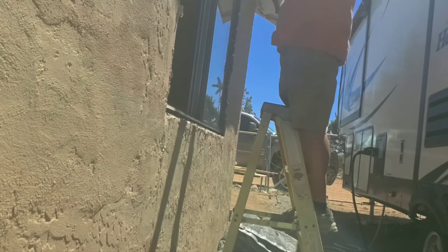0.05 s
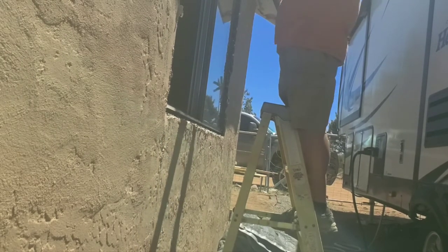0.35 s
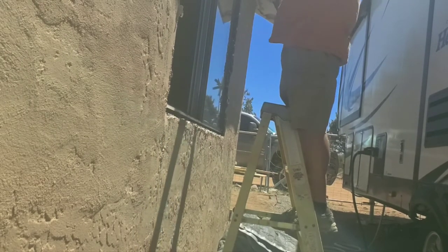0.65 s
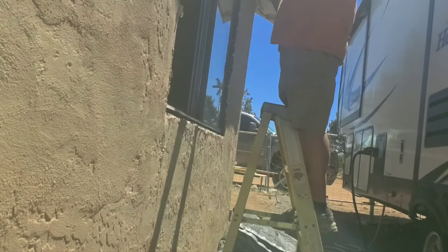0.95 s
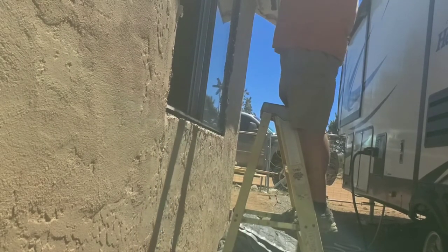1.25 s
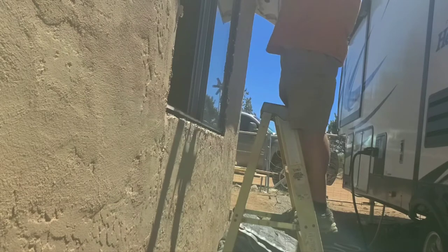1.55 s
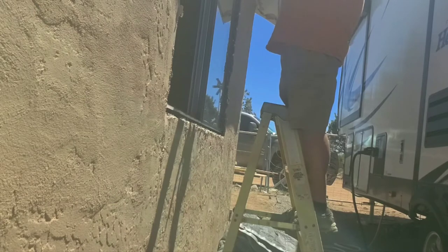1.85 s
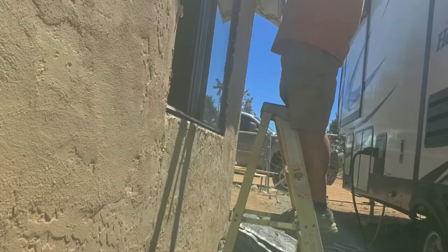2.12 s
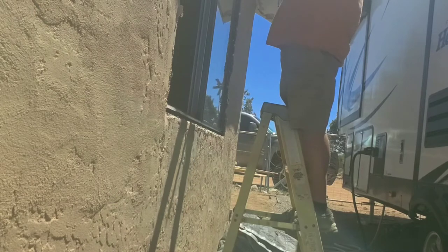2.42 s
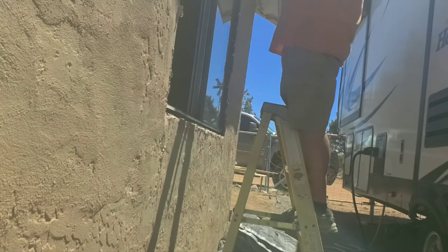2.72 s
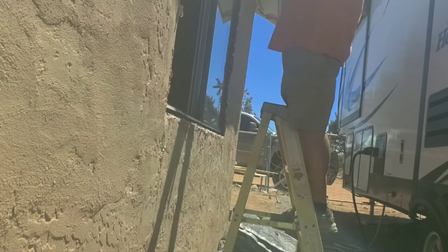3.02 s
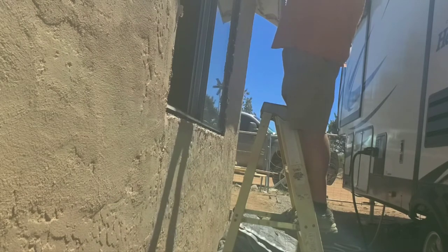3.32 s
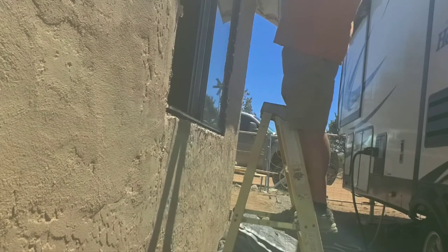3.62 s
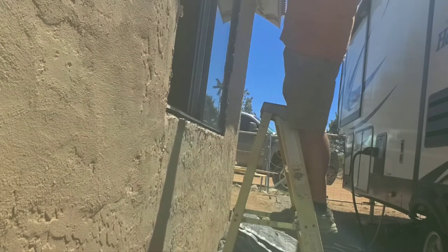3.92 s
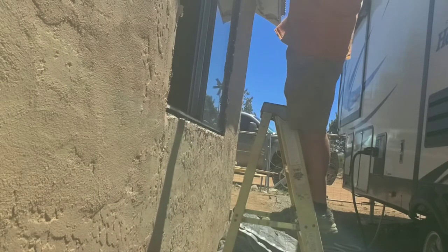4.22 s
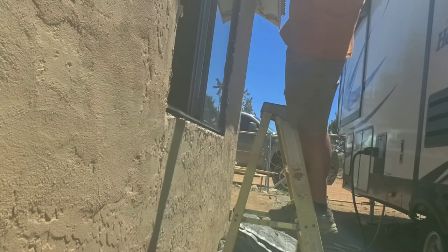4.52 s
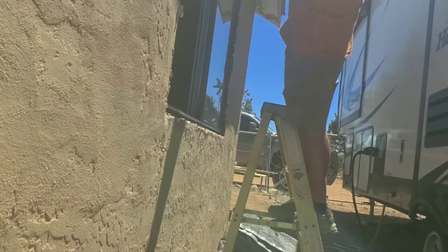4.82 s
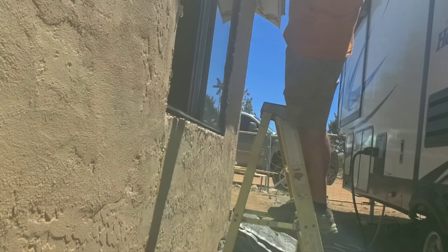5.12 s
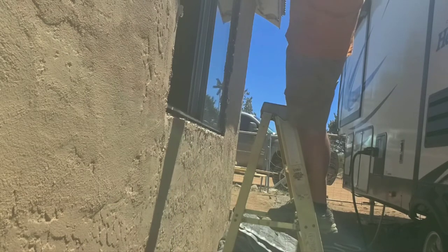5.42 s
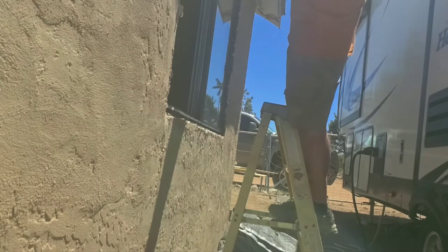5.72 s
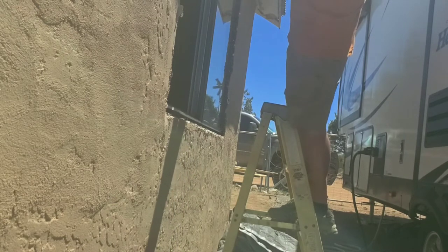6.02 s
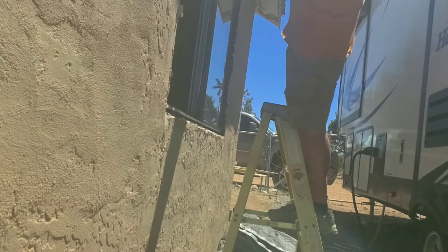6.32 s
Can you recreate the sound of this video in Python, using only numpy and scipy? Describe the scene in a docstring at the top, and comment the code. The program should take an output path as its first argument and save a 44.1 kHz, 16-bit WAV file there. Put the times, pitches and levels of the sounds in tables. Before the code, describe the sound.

The sound opens outdoors with a dull thump on a hollow wall and light wind buffeting the microphone. From about 0.5 to 2.5 seconds a steel bar is worked into stucco around a window: irregular gritty crunches, small clinks, snapping chips and soft thuds, with a faint squeaky scrape near 2.3 seconds. Up to 4 seconds it is quieter, with a few dull knocks and falling crumbs as the wind fades. At about 4.1 seconds a hammer starts striking the bar, eight loud, even blows roughly a third of a second apart, the hardest near 5.8 seconds and the last at 6.4. Each is a sharp steel hit with a short ring, some with a high ping, echoing briefly between the wall and a trailer alongside. Beneath the blows the wall thuds and shudders, loosened sand trickles faintly and a little wind returns.

```python
"""A hammer drives a steel bar into stucco around a window: eight ringing blows, each rattling between
the house wall and a trailer parked alongside. Before the blows the bar is worked into the crust, which
crunches and sheds chips. The hollow wall thuds and shudders, loosened sand trickles down,
and a light wind buffets the microphone."""
import sys
import numpy as np
from scipy import signal
from scipy.fft import rfft, irfft, next_fast_len
from scipy.io import wavfile
from scipy.ndimage import map_coordinates

SR = 44100
rng = np.random.default_rng(int(sys.argv[2]) if len(sys.argv) > 2 else 0)


def wav_record(signal):
    """Record a signal, one row per channel, as 16-bit PCM in the file named by sys.argv[1]."""
    frames = np.transpose(np.atleast_2d(signal))
    bounded = np.clip(frames, -1, 1)
    # unit amplitude maps onto the largest positive 16-bit level
    quanta = np.round(bounded * 32767).astype(np.int16)
    wavfile.write(sys.argv[1], SR, quanta)


N = 284886


def amp(db):
    """dB to gain."""
    return 10 ** (np.asarray(db) / 20)


def unit(x):
    """Scale to rms 1."""
    return x / np.sqrt(np.mean(x ** 2) + 1e-20)


def along(points, hz):
    """Interpolate (freq_hz, value) rows on a log axis."""
    freq_hz, values = np.transpose(points)
    return np.interp(np.log(hz + 1), np.log(freq_hz + 1), values)


def curve(rows):
    """Interpolate (time_s, value) rows per sample."""
    return np.interp(np.arange(N) / SR, *np.transpose(rows))


def wobble(rate_hz, size=N):
    """Smooth random curve."""
    knots = rng.standard_normal(int(size * rate_hz / SR) + 4)
    return map_coordinates(knots, [np.arange(size) * rate_hz / SR])


def fade(t, t60_s, rise_s):
    """Quick rise, exponential decay."""
    return (1 - np.exp(-t / rise_s)) * np.exp(-np.log(1000) * t / t60_s)


def add(track, start_s, sound):
    """Mix sound into track."""
    i = max(round(start_s * SR), 0)
    track[:, i:i + sound.shape[1]] += sound[:, :max(N - i, 0)]


def filtered(x, response):
    """Zero-phase filter with gain response(hz)."""
    size = x.shape[-1]
    padded = next_fast_len(size + 4096)
    return irfft(rfft(x, padded) * response(np.fft.rfftfreq(padded, 1 / SR)), padded)[..., :size]


def colour(x, spectrum):
    """Shape by (freq_hz, gain_db) rows; rms 1."""
    return unit(filtered(x, lambda hz: amp(along(spectrum, hz))))


def resonate(x, peaks):
    """Shape by (freq_hz, width_hz, gain_db) resonances; rms 1."""
    def response(f):
        return np.sqrt(sum(amp(db) ** 2 / (1 + (2 * (f - hz) / width_hz) ** 2) * np.minimum(f / hz, 1)
                           for hz, width_hz, db in peaks))
    return unit(filtered(x, response))


def noise(size, corr):
    """Stereo white noise with channel correlation corr."""
    angle = np.arccos(np.clip(corr, -1, 1)) / 2
    mid, side = rng.standard_normal((2, size)) * [[np.cos(angle)], [np.sin(angle)]]
    return np.array([mid + side, mid - side])


def grains(size, per_s, spread_db, corr, life_s=0.003):
    """Noise broken into tiny fractures of unequal strength."""
    starts = rng.random(size) < per_s / SR
    strength = amp(spread_db * np.clip(rng.standard_normal(size), -2, 2))
    power = signal.lfilter([1], [1, -np.exp(-1 / (life_s * SR))], starts * strength ** 2)
    return noise(size, corr) * np.sqrt(power)


def ring(t, modes, rise_s):
    """Free modes; reflections randomise strength, phase and flutter."""
    hz, db, t60_s = np.transpose(modes)[:, :, None]
    strength = amp(db + 2 * rng.standard_normal(hz.shape))
    phase = 2 * np.pi * rng.random(hz.shape) + 0.5 * rng.standard_normal((2, len(modes), 1))
    knots = rng.standard_normal((2, len(modes), 64))
    flutter = np.array([[np.interp(t * 60, np.arange(len(k)), k) for k in channel] for channel in knots])
    tones = np.sin(2 * np.pi * hz * t + phase + flutter / np.pi)
    return np.sum(strength * fade(t, t60_s, rise_s) * tones, axis=1)


# Breeze strength: time_s, level_db
BREEZE_LEVEL = [(0, -26.5), (.2, -36), (.45, -48), (.6, -37.5), (.97, -55.5), (1.2, -30), (1.65, -36.5),
                (2.38, -41.5), (2.54, -66.5), (2.82, -42.5), (3.0, -60.5), (3.5, -74), (4.08, -93),
                (4.55, -40.5), (4.9, -59.5), (5.02, -59), (5.5, -59.5), (6.46, -51)]
# Buffeting at the microphone: freq_hz, gain_db
BUFFET_SPECTRUM = [(15, -22), (28, -6), (55, 4.5), (90, 4), (130, -2.5), (230, -13), (390, -19.5),
                   (600, -33), (1200, -37), (3000, -51.5)]
# Outdoor air: freq_hz, gain_db
AIR_SPECTRUM = [(15, -64), (25, -43), (82, -26.5), (117, -25), (217, -44), (263, -22), (575, -24.5),
                (641, -21.5), (2410, -35.5), (3520, -41.5), (5200, -42), (8000, -79.5), (16000, -59)]


def wind(eddy_hz=24, eddy_db=5, port_db=1.5, air_db=-66):
    """Eddies, partly different at each microphone port, over quiet air."""
    shared = np.clip(wobble(eddy_hz), -2, 1)
    per_port = np.array([wobble(eddy_hz), wobble(eddy_hz)])
    eddies = amp(eddy_db * shared + port_db * per_port)
    buffet = amp(curve(BREEZE_LEVEL)) * unit(eddies * colour(noise(N, corr=-0.13), BUFFET_SPECTRUM))
    return buffet + amp(air_db) * colour(noise(N, corr=0.25), AIR_SPECTRUM)


# Dull contacts with wall and ground: start_s, level_db, pitch_hz, t60_s
THUMPS = [(.014, -21, 151, 0.14), (0.031, -26, 248, 0.11), (1.631, -34, 150, 0.22),
          (2.806, -39, 860, 0.046), (2.844, -31.5, 111, 0.093), (3.072, -36, 766, 0.073),
          (4.295, -27.5, 215.3, 0.18), (5.1, -39.5, 237, 0.16), (6.369, -34.5, 198.4, 0.31)]


def thumps():
    """Blunt contacts: one low resonance in a puff of rumble."""
    out, t = np.zeros((2, N)), np.arange(SR // 2) / SR
    for start_s, level_db, hz, t60_s in THUMPS:
        puff = colour(noise(len(t), corr=0.12), [(hz / 4, -16), (hz, 0), (hz * 2, -12), (hz * 6, -55)])
        body = 0.97 * np.sin(2 * np.pi * hz * t) + 0.74 * puff
        add(out, start_s, amp(level_db) * body * fade(t, t60_s, 0.0022))
    return out


# Chips snapping off and landing: start_s, level_db, sparkle_db, t60_s
CHIPS = [(0.021, -61, -27, 0.56), (0.106, -56, 11, .015), (0.353, -57, -3, .02), (0.656, -32, -36, 0.2),
         (0.764, -29, -32, 0.076), (1.180, -35, 15, 0.044), (1.269, -45.5, 1, 0.15),
         (1.406, -35.5, -5, 0.011), (1.478, -43, 2, .006), (1.495, -45, -23, 0.056),
         (1.615, -43.5, -29, 0.015), (1.682, -53, -8, 0.031), (1.744, -57.5, -18, 0.056),
         (1.84, -62, -5, .006), (1.982, -42, -13, 0.0082), (2.086, -53, -7, 0.032),
         (2.438, -43.5, -31, 0.04), (3.248, -61, -11, 0.11), (3.641, -45, -28, 0.077),
         (3.801, -53, -21, 0.12), (3.843, -51, -20, 0.097), (3.908, -51, -13, 0.028),
         (5.047, -52.5, -25.5, .08), (5.635, -37, -16, 0.1), (5.982, -44, -34, 0.18),
         (6.28, -50, -30, 0.24)]
# Grit: freq_hz, gain_db
GRIT_SPECTRUM = [(1200, -5), (2500, 2), (4000, -1.5), (6000, -2), (8000, -12), (15000, -5)]
# Top sparkle of grit: freq_hz, gain_db
SPARKLE_SPECTRUM = [(4000, -31.5), (9000, -13), (13000, -3), (16000, 5)]


def chips():
    """Each chip: a brittle crack, then a spray of crumbs."""
    def gritty(x, sparkle_db):
        return colour(x, GRIT_SPECTRUM) + amp(sparkle_db) * colour(x, SPARKLE_SPECTRUM)

    out, t = np.zeros((2, N)), np.arange(SR // 5) / SR
    for start_s, level_db, sparkle_db, t60_s in CHIPS:
        crack = amp(0.5) * gritty(noise(len(t), corr=0.2), sparkle_db) * fade(t, 0.004, 0.0001)
        spray = gritty(grains(len(t), per_s=3600, spread_db=14.5, corr=0.31), sparkle_db)
        envelope = fade(t, t60_s, 0.00044) + amp(-16) * fade(t, 0.22, 0.0031)
        add(out, start_s, amp(level_db) * (crack + spray * envelope))
    return out


# Crackle strength: time_s, level_db
CRACKLE_LEVEL = [(0, -129), (.4, -63), (.87, -71.5), (1.0, -69), (1.5, -83), (1.95, -68), (2.18, -80),
                 (2.4, -66), (2.7, -86), (3.15, -80.5), (3.5, -73), (3.85, -66.5), (4.15, -84), (4.8, -78),
                 (5.5, -72), (6.46, -68)]
# Fine crackle: freq_hz, gain_db
CRACKLE_SPECTRUM = [(2000, -18), (5000, -3), (7000, -3), (8500, -5), (10500, 0), (13000, -3), (15700, -3)]


def crackle(ticks_per_s=17, tick_db=-4):
    """The crust crackles softly; single grains tick."""
    fine = unit(grains(N, per_s=1000, spread_db=5.5, corr=0.1))
    ticks = unit((rng.random(N) < ticks_per_s / SR) * noise(N, corr=0.14))
    return amp(curve(CRACKLE_LEVEL)) * colour(fine + amp(tick_db) * ticks, CRACKLE_SPECTRUM)


# Prying knocks: start_s, level_db, thud_db, clink_db, t60_s, rise_s
KNOCKS = [(.517, -46, -1.5, -28, .14, 0.00087), (.613, -44.5, -17, -5, 0.12, 0.00083),
          (.643, -31.5, -10, 2.5, 0.28, 0.0015), (.68, -32.5, 7.5, 2, 0.062, 0.0014),
          (.763, -41, -3, 2, 0.12, 0.0015), (0.954, -44, 1, -1, 0.26, 0.00068),
          (0.985, -47.5, 8.5, -12, 0.41, 0.0023), (1.403, -58, -9, 0.5, 0.79, .001),
          (1.5, -41.5, 0.5, -8, 0.18, 0.0012), (1.908, -43, -10, -1, 0.19, 0.0023),
          (2.011, -54, 8, 5.5, .19, 0.0088), (2.272, -55.5, -16, 8.5, 0.45, 0.069),
          (2.358, -34, -14, -5, .14, 0.017), (2.394, -61.5, 13.5, -25, .09, .0024),
          (2.509, -58, -3, -1.5, 0.19, 0.0015), (2.766, -54.5, 8.5, -9, 0.28, 0.0031),
          (2.805, -74, -4, -29, 0.12, .001), (3.075, -44, 5.5, -21, 0.21, 0.00086),
          (3.397, -52.5, 12, -30, 0.2, 0.00057), (3.639, -54.5, 5, 0.5, 0.4, 0.00076),
          (4.288, -37, -12, -38, 0.11, 0.0018), (5.096, -57, 6, -26, 0.29, 0.0019),
          (6.364, -42, 5, -19.5, .11, 0.0018)]
# Crunching crust: freq_hz, gain_db
CRUST_SPECTRUM = [(300, -44), (550, 7), (680, -3), (830, 12), (1150, -1.5), (1450, -1), (2600, -5.5),
                  (4500, -14.5), (7000, -19.5), (11000, -51)]
# Lightly scraped bar: freq_hz, width_hz, gain_db
CLINK_PEAKS = [(2306, 20, 8), (2530, 460, 6), (3220, 210, 2), (3590, 45, 5), (4267, 49, 8.5),
               (4744, 69, 3.5), (6330, 240, -4.5)]
# Hollow wall: freq_hz, gain_db
THUD_SPECTRUM = [(70, -29), (120, -2.5), (200, -1), (280, -10.5), (360, 5), (430, 1), (510, -4),
                 (750, -17.5), (1300, -61)]


def prying():
    """The bar levers on the crust: crunch, steel clink, wall thud."""
    out, t = np.zeros((2, N)), np.arange(SR // 4) / SR
    for start_s, level_db, thud_db, clink_db, t60_s, rise_s in KNOCKS:
        crunch = colour(grains(len(t), per_s=1100, spread_db=5.5, corr=0.5), CRUST_SPECTRUM)
        slips = grains(len(t), per_s=900, spread_db=4, corr=0.4)
        clink = amp(clink_db) * resonate(slips, CLINK_PEAKS)
        thud = amp(thud_db) * colour(noise(len(t), corr=0.35), THUD_SPECTRUM) * fade(t, 0.33, 0.0041)
        add(out, start_s, amp(level_db) * ((crunch + clink) * fade(t, t60_s, rise_s) + thud))
    return out


# Shuddering wall: freq_hz, gain_db
SHUDDER_SPECTRUM = [(20, -13.5), (50, 5.5), (90, 11.5), (140, -9), (250, -16), (600, -43)]


def wall_shudder(knock_gain_db=-6, blow_gain_db=-31):
    """The wall rumbles after each knock and blow, in proportion to its force."""
    power, t = np.zeros((1, N)), np.arange(SR // 2) / SR
    envelope = fade(t, t60_s=0.66, rise_s=0.022)[None]
    shoves = [(start_s, db + thud_db + knock_gain_db) for start_s, db, thud_db, *_ in KNOCKS]
    shoves += [(start_s, db + blow_gain_db) for start_s, db, *_ in BLOWS]
    for start_s, level_db in shoves:
        add(power, start_s, (amp(level_db) * envelope) ** 2)
    return np.sqrt(power) * colour(noise(N, corr=0.46), SHUDDER_SPECTRUM)


# Bar springing free: start_s, level_db
PINGS = [(.70, -41), (0.779, -43), (4.152, -27), (4.51, -16), (4.822, -24.5), (5.451, -31.5), (5.773, -24)]


def bar_pings(pitch_hz=4215, split_hz=35):
    """The freed bar rings in one bending mode, split by its uneven section."""
    out, t = np.zeros((2, N)), np.arange(SR // 2) / SR
    for start_s, level_db in PINGS:
        upper = amp(-9) * np.sin(2 * np.pi * ((pitch_hz + split_hz) * t + rng.random((2, 1))))
        lower = np.sin(2 * np.pi * (pitch_hz * t + rng.random()) + [[0], [0.7]])
        add(out, start_s, amp(level_db) * (lower + upper) * fade(t, 0.16, 0.008))
    return out


# Hammer touching the bar: start_s, level_db
TAPS = [(.766, -37), (1.182, -41), (1.189, -50), (2.436, -54), (3.638, -45.5)]
# Tapped steel: freq_hz, gain_db, t60_s
TAP_MODES = [(2722, -1.5, 0.084), (3510, -6, 0.072), (5150, -13.5, .1), (6800, -42, 0.028),
             (10360, -8, .06), (13460, -13, 0.039), (15390, -23, 0.048)]


def taps():
    """Light steel-on-steel touches excite a few high, short modes."""
    out, t = np.zeros((2, N)), np.arange(SR // 8) / SR
    for start_s, level_db in TAPS:
        add(out, start_s, amp(level_db) * ring(t, TAP_MODES, rise_s=0.00023))
    return out


# Tip dragging along the edge: start_s, length_s, level_db
SCRATCHES = [(2.254, 0.21, -65.5), (3.362, 0.54, -78)]
# Squeaking bar: freq_hz, width_hz, gain_db
SQUEAK_PEAKS = [(6090, 60, 3), (6570, 47, 1), (10420, 47, 4.5), (13600, 140, -9), (16000, 110, 3)]


def scratches():
    """A swell of tiny slips over stucco excites the bar's high modes."""
    out = np.zeros((2, N))
    for start_s, length_s, level_db in SCRATCHES:
        size = int(length_s * SR)
        squeak = resonate(grains(size, per_s=300, spread_db=4, corr=0.53), SQUEAK_PEAKS)
        add(out, start_s, amp(level_db) * squeak * np.sin(np.linspace(0, np.pi, size)))
    return out


# Blows: start_s, level_db, spit_db, echo_db, ring_db, crush_s, main_db, flank_db
BLOWS = [(4.149, -12.5, -13, 5.5, -28, 0.011, -3, -2), (4.508, -14.5, -34, 3.5, -24, 0.0097, 3, 4.5),
         (4.818, -13, -27.5, 5.5, -27.5, 0.0083, 4.5, 2.5), (5.138, -11.5, -4, 4, -29.5, .0099, 3, -9),
         (5.448, -10.5, -18.5, 5, -20, 0.0099, -4, -2.5), (5.769, -6, -4.5, 4.5, -25.5, 0.0073, -9.5, -5.5),
         (6.085, -11, -15, 6, -20, 0.007, 2, -9.5), (6.402, -11.5, -2, 3.5, -21, 0.011, 2, -2.5)]
# Bar damped by the wall: freq_hz, width_hz, gain_db
PRESSED_BAR_PEAKS = [(825, 87, -14), (1405, 37, -54), (1863, 660, -14.5), (2719, 227, 0), (3430, 310, -8),
                     (4555, 54, -10), (5113, 116, -2.5), (6200, 265, -11.5), (8820, 260, -16.5),
                     (10330, 520, -24), (11940, 360, -23.5), (12800, 130, -30.5), (14670, 89, -20)]
# Bar, frame and wall ringing together: freq_hz, gain_db, t60_s
RING_MODES = [(392, -9, .5), (441, -9, .5), (500, -13, .4), (866, -5, .3), (1512, -7, .3), (1744, -3, .32),
              (1868, -8, .24), (1991, -6, .22), (2121, -7, .25), (2530, -4, .27), (2612, -3, .2),
              (2784, -3, .15), (2858, -5, .2), (3235, -7, .22), (3590, -4, .25), (2934, -5, .17),
              (4196, -3, .26), (4581, -1, .23), (4700, 0, .25), (5150, -4, .2), (6180, -7, .18),
              (6303, -10, .17), (6578, -6, .19), (8301, -12, .22), (8885, -5, .2), (10045, -13, .15),
              (10820, -18, .2), (11848, -17, .18), (15353, -6, .17), (15730, -9, .18)]


def hammer_blows():
    """Each blow crushes stucco under the bar; bar, wall and yard ring on."""
    out, t = np.zeros((2, N)), np.arange(SR * 2 // 5) / SR
    for start_s, level_db, spit_db, echo_db, ring_db, crush_s, main_db, flank_db in BLOWS:
        # Force builds as the tip bites, drops as the crust yields.
        force = (1 - np.exp(-(t / 0.0025) ** 2)) / (1 + (t / crush_s) ** 8)
        pressed_bar = resonate(noise(len(t), corr=0.73), PRESSED_BAR_PEAKS)
        crush = unit(force * pressed_bar) * np.sqrt(np.mean(force ** 2))
        spit = amp(spit_db) * colour(noise(len(t), corr=0.1), SPARKLE_SPECTRUM) * fade(t, 0.041, 0.001)
        thud = amp(-18) * colour(noise(len(t), corr=0.63), THUD_SPECTRUM) * fade(t, 0.25, 0.05)
        steel = amp(ring_db) * ring(t, RING_MODES, rise_s=0.013)
        blow = crush + spit + thud + steel + amp(echo_db) * yard_echo(crush)
        add(out, start_s - 0.0015, amp(level_db) * strike_point(blow, main_db, flank_db))
        # A faint noise leads into each blow and softens its onset.
        lead_in = resonate(noise(len(t), corr=0.7), PRESSED_BAR_PEAKS) * fade(t, 0.089, 0.0015)
        add(out, start_s - 0.004, amp(level_db - 23) * lead_in)
    return out


def strike_point(x, main_db, flank_db, main_hz=2630, flanks_hz=(800, 3480)):
    """Where the hammer lands weights the bar's main mode and the two flanking it."""
    def band(f, hz):
        return np.exp(-((f / hz - 1) / 0.11) ** 2)

    def response(f):
        return amp(main_db * band(f, main_hz) + flank_db * sum(band(f, hz) for hz in flanks_hz))
    return filtered(x, response)


# Yard decay: freq_hz, t60_s
YARD_DECAY = [(100, 0.4), (420, 0.63), (1000, 0.26), (2800, 0.31), (6000, 0.22), (10000, 0.17),
              (16000, 0.19)]
# Yard reflections: freq_hz, gain_db
YARD_SPECTRUM = [(100, 9.5), (400, 14.5), (650, 0.5), (1000, -0.5), (1600, 2), (2700, -13.5), (4300, 0),
                 (5200, -10.5), (6400, -6.5), (7400, -6), (11000, -1.5), (16000, 3.5)]


def yard_echo(x):
    """Dense reflections between wall and trailer, peaking at the ring modes; treble dies first."""
    def response(f):
        peaks = sum(1 / (1 + ((f - mode_hz) / (8 + mode_hz / 300)) ** 2) for mode_hz, *_ in RING_MODES)
        return amp(along(YARD_SPECTRUM, f)) * np.sqrt(0.45 + 2.2 * peaks)

    size = x.shape[1]
    hz, time_s, bins = signal.stft(noise(size, corr=0.55), SR, nperseg=256)
    decay = np.exp(-np.log(1000) * time_s / along(YARD_DECAY, hz)[:, None])
    tail = signal.istft(bins * decay, SR, nperseg=256)[1][:, :size]
    tail = filtered(tail / np.linalg.norm(tail[0]), response)
    return signal.fftconvolve(x, tail, axes=1)[:, :size]


# Window frame: freq_hz, width_hz, gain_db
FRAME_PEAKS = [(822, 62, 2), (1060, 130, -13.5)]


def frame_knocks():
    """Blows pass through the stucco to the frame, harder with strong flanking modes."""
    out, t = np.zeros((2, N)), np.arange(SR // 5) / SR
    for start_s, level_db, *_, flank_db in BLOWS:
        knock = resonate(noise(len(t), corr=0.1), FRAME_PEAKS) * fade(t, 0.12, 0.0012)
        add(out, start_s, amp(level_db + flank_db - 18) * knock)
    return out


def hammer_note(pitch_hz=8909, turn_hz=1.14, base_db=-45.5, db_per_blow_db=1.94):
    """The head sings one thin note; its level flutters and dips as it turns on the backswing."""
    out, t = np.zeros((2, N)), np.arange(SR // 2) / SR
    mean_blow_db = np.mean([db for _, db, *_ in BLOWS])
    beam = np.cos(2 * np.pi * turn_hz * (t - 0.11) + [[0], [0.4]]) + 0.3j
    for start_s, blow_db, *_ in BLOWS:
        flutter = 0.99 * np.array([wobble(31, len(t)) + 1j * wobble(35, len(t)) for _ in range(2)])
        note = np.real((beam + flutter) * np.exp(2j * np.pi * (pitch_hz * t + rng.random())))
        level_db = base_db + db_per_blow_db * (blow_db - mean_blow_db)
        add(out, start_s, amp(level_db) * note * fade(t, 1.01, 0.001))
    return out


# Trickling sand and crumbs: freq_hz, gain_db
SAND_SPECTRUM = [(1200, -30), (2500, -3), (4000, 0), (6000, -4), (8000, -16), (11000, -18), (15000, -22)]


def sand_showers(fall_s=0.11, log_spread=0.79, first_db=-72, step_db=2):
    """Each blow loosens more sand than the last; it lands a moment later."""
    power, t = np.zeros((1, N)), np.arange(1, SR) / SR
    shower = np.exp(-(np.log(t / fall_s) / log_spread) ** 2 / 2)[None]
    for k, (start_s, *_) in enumerate(BLOWS):
        add(power, start_s, amp(first_db + step_db * k) ** 2 * shower)
    return np.sqrt(power) * colour(grains(N, per_s=500, spread_db=5, corr=0.3), SAND_SPECTRUM)


# Stereo width: freq_hz, side_gain_db
STEREO_WIDTH = [(100, -4.5), (300, -12.5), (1100, 5), (2600, 0.5), (5000, 3.5), (10000, 3.5)]


def scene():
    """The work sits slightly left, spread wide by the nearby wall."""
    work = hammer_blows() + frame_knocks() + hammer_note() + bar_pings() + prying() + scratches()
    left, right = work + taps() + chips() + sand_showers() + crackle() + thumps()
    mid = (left + right) / 2
    side = filtered((left - right) / 2, lambda hz: amp(along(STEREO_WIDTH, hz)))
    return np.array([mid + side, mid - side]) * amp([[0.9], [-0.9]]) + wall_shudder() + wind()


def record(dry, cutoff_hz=16000):
    """Soft clip, then steep low-pass."""
    rounded = dry / (1 + np.abs(dry) ** 6) ** (1 / 6)
    return filtered(rounded, lambda hz: 1 / np.sqrt(1 + (hz / cutoff_hz) ** 160))


dry = scene()
out = record(dry)
wav_record(out)
```